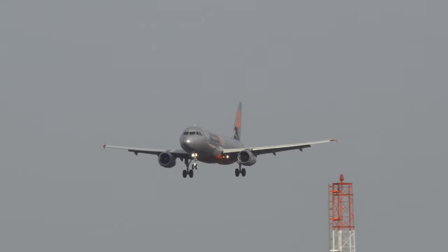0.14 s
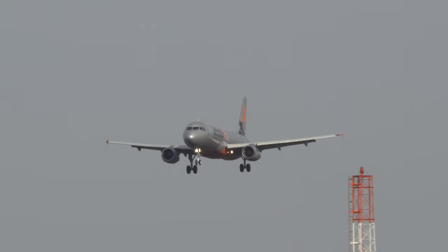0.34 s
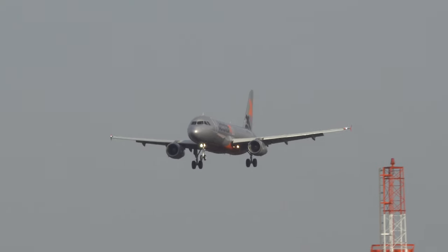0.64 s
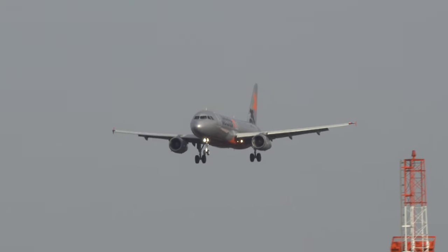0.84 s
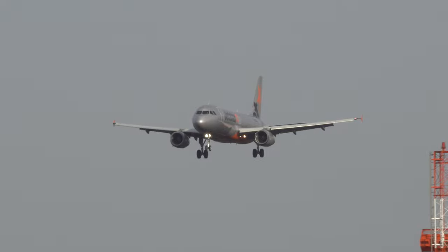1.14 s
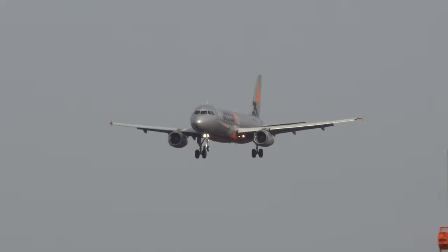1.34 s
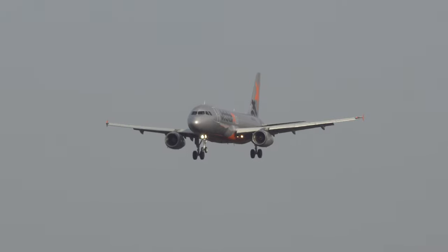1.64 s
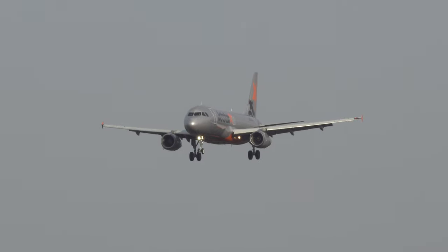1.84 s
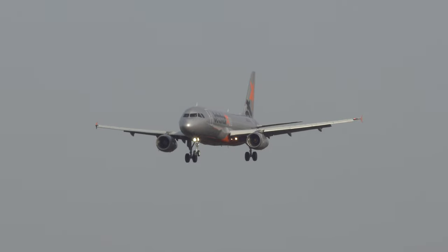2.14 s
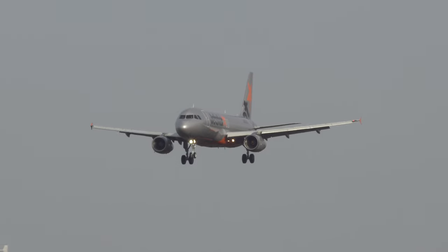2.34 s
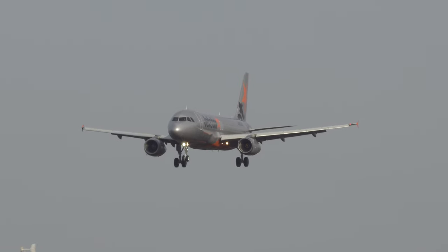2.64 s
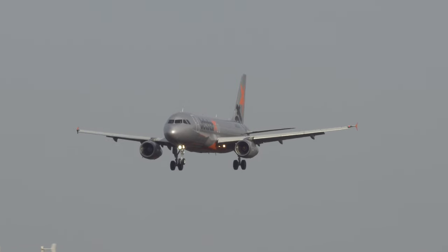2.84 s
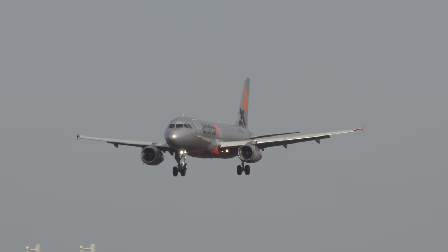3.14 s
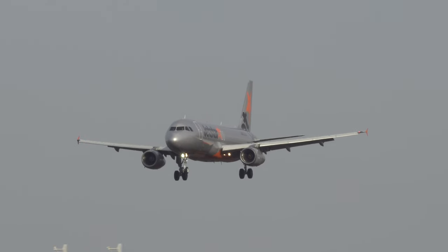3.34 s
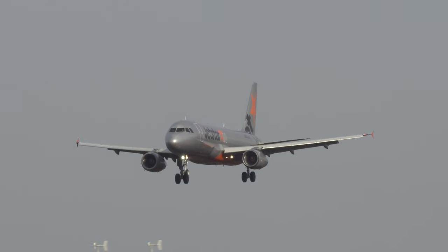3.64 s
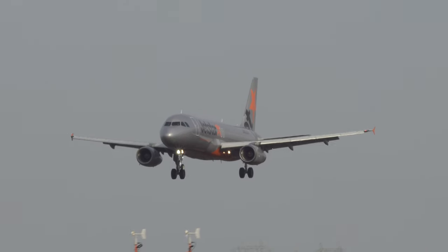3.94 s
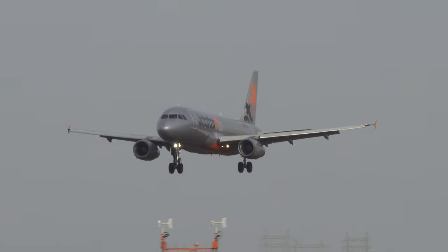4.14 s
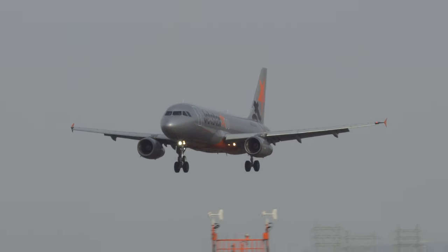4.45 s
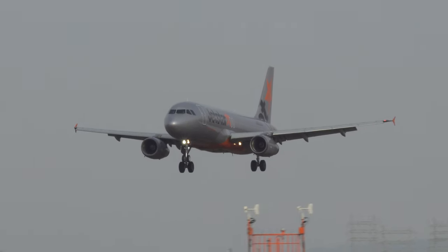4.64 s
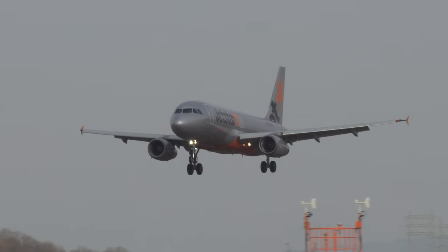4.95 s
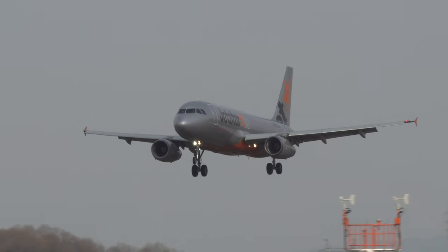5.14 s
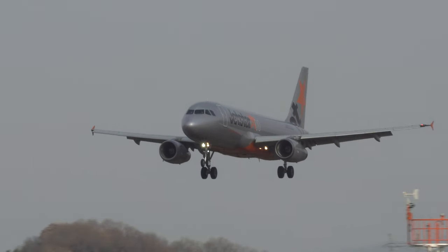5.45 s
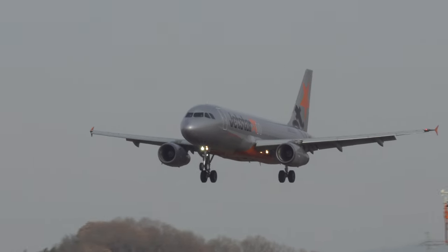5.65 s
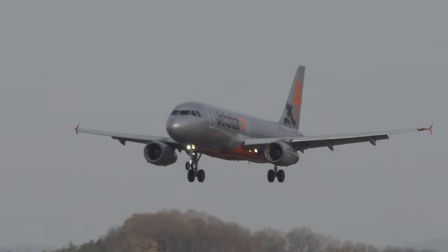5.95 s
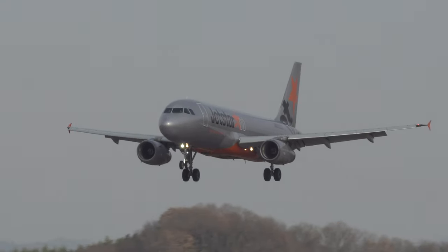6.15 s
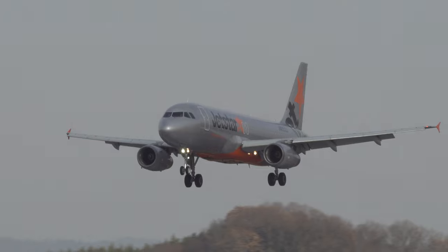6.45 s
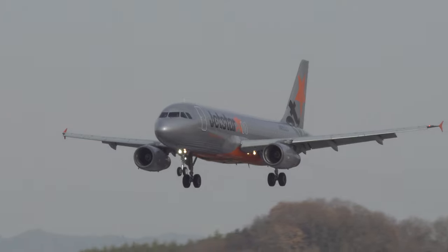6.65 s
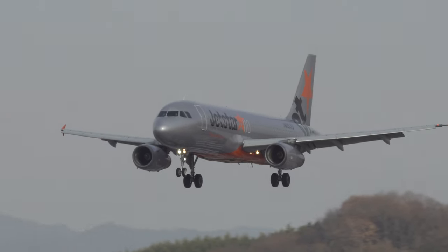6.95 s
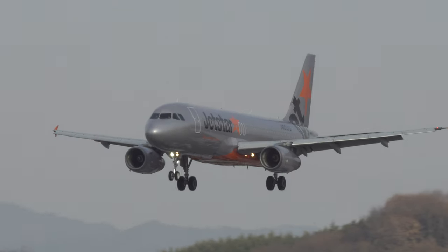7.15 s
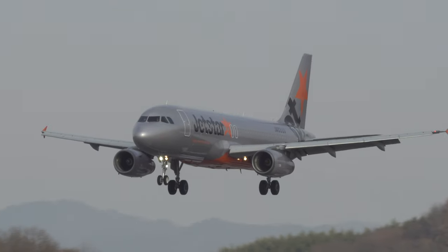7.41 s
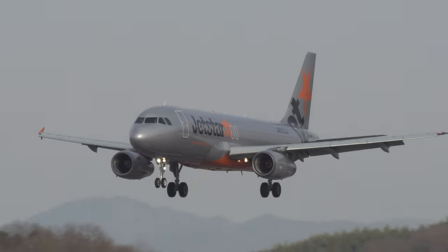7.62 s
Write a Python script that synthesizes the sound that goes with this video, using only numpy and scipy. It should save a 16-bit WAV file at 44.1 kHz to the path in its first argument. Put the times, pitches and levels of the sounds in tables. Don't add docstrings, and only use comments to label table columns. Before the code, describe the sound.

An open, windy field near an airport, heard by two spaced outdoor microphones. From the start, low wind pressure rumbles and thumps independently on each side, heavier on the right, with strong gusts around 3 and 3.5 s and again near 6.6 s that almost overload. Beneath lie soft field ambience, faint machine hums and steady hiss. Distant hoarse crow caws come at about 0.4, 1.0, 1.1, 1.6, 2.3 and 2.9 s. The jet is at first a muffled, far roar with a thin whine near 1.1 kHz; it rises a little by 2.5 s, then clearly from 4 to 5 s. Close-set fan tones and higher compressor tones shimmer, beat and fade in turn, sagging slightly in pitch. From 6 s the roar is brighter and flutters in turbulence, the whine sharper, one tone creeping up at the end. It stops around 7.8 s at its loudest, stronger on the right, before any flyover.

```python
import sys
import numpy as np
from scipy import signal
from scipy.fft import rfft, irfft, next_fast_len
from scipy.io import wavfile
from scipy.ndimage import uniform_filter1d

SR = 44100
rng = np.random.default_rng(int(sys.argv[2]) if len(sys.argv) > 2 else 0)


def wav_out(sig):
    wavfile.write(sys.argv[1], SR, np.round(np.clip(np.atleast_2d(sig).T, -1, 1) * 32767).astype(np.int16))


def invert_db(level):
    return 10 ** (np.asarray(level, dtype=float) / 20)


N = 343098
PADDED = next_fast_len(N)
HZ = np.fft.rfftfreq(PADDED, 1 / SR) + 1e-3
TIME = np.arange(N) / SR


def rms_one(x):
    return x / np.sqrt(np.mean(x ** 2) + 1e-20)


def in_time(rows):
    s, *columns = np.transpose(rows)
    return [np.interp(TIME, s, c) for c in columns]


def at_hz(points, hz, column=1):
    points = np.array(points)
    return np.interp(np.log(hz), np.log(points[:, 0]), points[:, column])


def drift(rate_hz):
    r = np.exp(-128 * np.pi * rate_hz / SR)
    slow = signal.lfilter([1], [1, -2 * r, r * r], rng.standard_normal(N // 64 + 2002))
    slow = slow[2000:]
    return np.interp(np.arange(N) / 64, np.arange(len(slow)), rms_one(slow))


def bumps(s, half_s, db):
    coarse = TIME[::64, None]
    bells = np.exp(-.5 * ((coarse - s) / half_s) ** 2)
    return np.interp(TIME, coarse[:, 0], bells @ db)


def coloured(spectrum, under=9.0, over=5.4):
    low_end = np.minimum(1, HZ / spectrum[0][0]) ** under
    high_end = np.minimum(1, spectrum[-1][0] / HZ) ** over
    return rfft(rng.standard_normal(PADDED)) * invert_db(at_hz(spectrum, HZ)) * low_end * high_end


def wave_of(spectrum):
    return irfft(spectrum, PADDED)[:N]


def band_rms(spectrum, low, high):
    inside = (HZ > low) & (HZ < high)
    return np.sqrt(2 * np.sum(np.abs(spectrum[inside]) ** 2)) / PADDED


# time in seconds, level in dB.
HISS = [(0.1, -67), (1.33, -65), (3.97, -68), (5.45, -65.5), (7.7, -69)]
# frequency in Hz, density in dB per Hz.
HISS_COLOUR = [(500, 2), (4500, 2.2), (11000, 1.3), (16000, 1.5)]
# pitch in Hz, level in dB.
WHISTLES = [(11958, -92), (11988, -92)]


def preamp():
    noises = [coloured(HISS_COLOUR, under=0.12) for side in range(2)]
    hiss = np.array([wave_of(n) / band_rms(n, 5000, 15000) for n in noises])
    whistles = sum(np.sqrt(2) * invert_db(db) * np.sin(2 * np.pi * hz * TIME) for hz, db in WHISTLES)
    side_db = np.array([[-.4], [.4]])
    return invert_db(in_time(HISS)[0] + 1.0 + side_db) * hiss + whistles


# frequency in Hz, density in dB per Hz.
AMBIENCE = [(200, -8), (350, -6), (450, 0), (600, -1), (900, -8), (1150, -5.5), (1500, -12), (2000, -17),
            (2600, -25), (3300, -34)]
# pitch in Hz, width in Hz, level in dB over the ambience.
HUMS = [(292, 14, 9), (712, 10, 5), (790, 14, 9), (1700, 25, 6)]
AMBIENCE_DB = -52.5


def field():
    hums_db = sum(db * np.exp(-2 * ((HZ - hz) / width) ** 2) for hz, width, db in HUMS)
    sides = []
    for side in range(2):
        ambience = rms_one(wave_of(coloured(AMBIENCE) * invert_db(hums_db)))
        sides.append(ambience * invert_db(2.1 * drift(1.5)))
    return invert_db(AMBIENCE_DB) * np.array(sides)


# start in seconds, length in seconds,
# first, middle and last pitch in Hz, level in dB.
CAWS = [
    (.42, .14, 1170, 1160, 1030, -56),
    (1.0, .13, 1020, 1070, 980, -53),
    (1.11, .09, 1290, 1220, 1130, -55),
    (1.58, .14, 960, 1040, 1000, -54),
    (2.33, .1, 990, 1010, 970, -57),
    (2.89, .1, 1230, 1170, 1110, -55),
]


def crows():
    out = np.zeros(N)
    for (s, length_s, *hz, db), start in zip(CAWS, rng.random(len(CAWS))):
        u = np.linspace(0, 1, round(length_s * SR))
        pitch = np.polyval(np.polyfit([0, .5, 1], hz, 2), u)
        phase = 2 * np.pi * (np.cumsum(pitch) / SR + start)
        voice = np.sin(phase) + .2 * np.sin(1.5 * phase)
        i = round(s * SR)
        out[i:i + len(u)] += invert_db(db + 3) * np.sin(np.pi * u) ** .7 * voice
    side_db = np.array([[0], [-2.0]])
    return out * invert_db(1.7 * drift(40.0) + side_db)


def gusts(spectrum, pressure_db, flutter_db):
    noise = coloured(spectrum, under=2.5, over=4.0) / np.sqrt(1 + (HZ / 105) ** 4)
    slow_share = 1 / (1 + (HZ / 45) ** 6)
    slow = wave_of(noise * np.sqrt(slow_share))
    size = np.abs(signal.hilbert(slow, PADDED)[:N]) ** 2
    size = uniform_filter1d(uniform_filter1d(size, size=2500), size=2500)
    slow = rms_one(slow / np.sqrt(size + .03 * size.mean()))
    fast = wave_of(noise * np.sqrt(1 - slow_share)) / band_rms(noise, 45, 130)
    fade_in = np.sin(np.pi / 2 * np.minimum(TIME / .04, 1)) ** 2
    return (invert_db(pressure_db - .7) * slow + invert_db(flutter_db) * fast) * fade_in


# time in seconds, left level in dB, right level in dB.
WIND = [(0, -24.5, -20), (.5, -22, -13.5), (1.3, -18.5, -12), (2.0, -19, -11.5), (2.4, -17, -14.5),
        (2.9, -16, -7.5), (3.2, -13, -10.5), (3.5, -13, -7.5), (3.9, -17, -15.5), (4.3, -17.5, -14.5),
        (4.8, -16.5, -12), (5.4, -21, -15.5), (5.7, -18, -20.5), (6.1, -23, -12), (6.6, -19, -8),
        (6.9, -14, -13.5), (7.3, -22.5, -13.5), (7.78, -29, -24)]
# time in seconds, left change in dB, right change in dB.
PUFFS = [(.62, 3, 0), (.8, -4, 0), (.92, 3, -2), (1.1, -6, 1), (1.2, 0, 2), (1.55, 5, -1), (1.78, -4, -2),
         (2.1, -2, 3), (2.2, 0, -3), (2.3, 6, 0), (2.42, -3, 0), (2.6, -1, 3), (2.7, 4, -5), (2.96, -2, 3),
         (3.3, 4, 0), (3.6, -4, -3), (3.7, 0, 3), (4.03, -3, 0), (4.2, 2, 2), (4.6, 3, 3), (4.9, -5, -3),
         (5.15, 3, 1), (5.6, -7, -3), (5.82, 6, 0), (5.95, 0, 4), (6.1, 2, -3), (6.5, 4, 0), (6.665, 0, -5),
         (7.05, -7, 0), (7.5, 6, 2)]
# frequency in Hz, density in dB per Hz.
WIND_LEFT = [(5, -22), (8, 6.5), (12, -5.5), (18, -0.5), (25, -10), (35, -18), (50, -24.5), (70, -25),
             (100, -21), (140, -44), (200, -50)]
WIND_RIGHT = [(5, -14.5), (8, 4), (12, 2), (18, -1), (25, -3), (35, -9), (50, -14), (70, -21), (100, -26.5),
              (140, -29), (200, -33.5)]
# left level in dB, right level in dB.
FLUTTER_DB = [-38.5, -26]
PUFF_S = 0.047
FLUTTER_FOLLOWS, FLUTTER_PUFFS = 0.91, 0.47


def wind():
    s, *puffs_db = np.transpose(PUFFS)
    out = []
    for colour, gust_db, db, base_db in zip((WIND_LEFT, WIND_RIGHT), in_time(WIND), puffs_db, FLUTTER_DB):
        puff_db = bumps(s, PUFF_S, db)
        swing_db = gust_db - gust_db.mean()
        flutter_db = base_db + FLUTTER_FOLLOWS * swing_db + FLUTTER_PUFFS * puff_db
        out.append(gusts(colour, gust_db + puff_db, flutter_db))
    return np.array(out)


def late(x, ms):
    return np.interp(TIME - ms / 1000, TIME, x)


# frequency in Hz, level in dB, extra lag in ms.
SHADE = [(200, -11.2, .09), (500, -11.2, .04), (1000, -11.9, .005), (2500, -11.8, -.01)]


def both_capsules(x, hz, lag_ms):
    left = invert_db(at_hz(SHADE, hz)) * late(x, lag_ms + at_hz(SHADE, hz, column=2))
    return np.array([left, x])


# time in seconds, half length in seconds,
# centre in Hz, change in dB.
EDDIES = [(0.0, 0.03, 280, 6), (0.037, .08, 1400, 2.5), (1.242, 0.3, 680, 4), (1.45, 0.13, 2360, 4),
          (1.9, 0.45, 610, 5.5), (1.9, 0.07, 790, 2.5), (2.6, 0.24, 280, 4), (3.053, 0.064, 1700, -1),
          (3.401, 0.33, 280, 2.5), (3.952, 0.056, 900, -4), (4.15, 0.09, 280, -1.5),
          (4.41, 0.035, 1500, 2.5), (4.702, 0.14, 710, -4), (4.983, 0.086, 795, 1), (5.4, 0.5, 430, 3.5),
          (5.434, 0.028, 1800, -2.5), (5.6, .1, 730, 3.5), (6.191, 0.069, 280, -1), (6.264, 0.12, 700, 2.5),
          (6.709, 0.092, 1200, 6), (7.113, 0.086, 1100, 5.5), (7.132, 0.044, 5200, 8),
          (7.352, 0.058, 705, 2.5), (7.5, 0.054, 5300, 2), (7.7, .15, 5530, 2), (5.747, 0.32, 197, 4.5),
          (.6, 0.18, 434, 1.5), (6.65, .1, 5230, -2), (7.55, 0.076, 1600, 2)]
# time in seconds, half length in seconds, change in dB.
EDGE_EDDIES = [(1.7, .15, 8), (2.25, .07, 6.5), (2.55, .1, 5), (3.0, .5, 3.5), (3.6, .3, 4),
               (4.197, 0.046, 9), (4.364, .07, 10), (4.747, 0.092, 9), (4.87, .03, -7), (4.983, .06, 5.5),
               (5.183, 0.043, 6.5), (5.5, 0.41, 6.5), (5.86, 0.04, -10), (5.97, 0.062, 1.5),
               (6.08, 0.044, -1), (6.238, 0.051, 9.5), (6.447, .1, -4.5), (6.66, 0.065, 5.5),
               (6.897, .08, -0.5), (7.3, .2, 2), (7.72, 0.2, -4.5)]
EDDY_OCTAVES, EDGE_HZ, EDGE_OCTAVES = 0.68, 3140, 0.21


def eddies(hz):
    s, half_s, centre_hz, db = np.transpose(EDDIES)
    reach = np.exp(-.5 * (np.log2(hz / centre_hz) / EDDY_OCTAVES) ** 2)
    edge = np.exp(-.5 * (np.log2(hz / EDGE_HZ) / EDGE_OCTAVES) ** 2)
    return bumps(s, half_s, db * reach) + edge * bumps(*np.transpose(EDGE_EDDIES))


# lower edge in Hz, upper edge in Hz.
JET_BANDS = [(190, 400), (450, 950), (1150, 1950), (2600, 3600)]
# frequency in Hz, density in dB per Hz.
ROAR = [(85, 4), (120, 5), (190, -5), (330, -4.5), (500, -5.5), (700, -3), (950, -2.5), (1150, -1),
        (1400, -2.5), (1750, -5.5), (2200, -10.5), (2700, -20), (3300, -29), (4800, -51)]
DISTANT_DB = [-44.5, -45.5, -47, -72]
FOLLOWS = [.25, .8, 1.01, 1.35]


def roar(near_db, lag_ms, patchy_db, absorb_db_per_s, scatter_db):
    noise, scattered = coloured(ROAR, under=2.2, over=9.0), coloured(ROAR)
    gains_db = []
    for distant_db, share, band in zip(DISTANT_DB, FOLLOWS, JET_BANDS):
        gains_db.append(distant_db + share * near_db - 20 * np.log10(band_rms(noise, *band)))
    gains_db.append(gains_db[3] - absorb_db_per_s * (TIME[-1] - TIME))
    places = np.log([np.sqrt(a * b) for a, b in JET_BANDS] + [4500])
    third_octave = np.log(2) / 3
    out = np.zeros((2, N))
    for hz in 70 * 2 ** (np.arange(20) / 3):
        place = np.interp(np.log(hz), places, np.arange(5))
        k = min(int(place), 3)
        level_db = (k + 1 - place) * gains_db[k] + (place - k) * gains_db[k + 1]
        flicker_db = patchy_db * (1 + min(hz / 2500, 1.2) ** 2) * drift(6.0)
        gain = invert_db(level_db + eddies(hz) + flicker_db)
        window = np.clip(1 - np.abs(np.log(HZ / hz)) / third_octave, 0, 1)
        out += both_capsules(gain * wave_of(noise * window), hz, lag_ms)
        out[0] += invert_db(scatter_db) * gain * wave_of(scattered * window)
    return out


def tone(hz, db, lag_ms, wander_hz, flutter_db):
    phase = 2 * np.pi * (np.cumsum(hz + wander_hz * drift(5.04)) / SR + rng.random())
    phase += .33 * drift(25.0)
    wave = np.sqrt(2) * invert_db(db + flutter_db * drift(12.0)) * np.sin(phase)
    return both_capsules(wave, hz.mean(), lag_ms)


# time in seconds, pitch in Hz.
FAN_A = [(0, 1128), (1.1, 1106), (1.9, 1095), (3.5, 1092), (5.1, 1082), (5.9, 1073), (6.5, 1063),
         (7.78, 1060)]
FAN_B = [(0, 1151), (1.2, 1136), (3.6, 1122), (5.2, 1102), (5.6, 1102), (6.6, 1082), (7.0, 1082),
         (7.5, 1092), (7.78, 1103)]
# time in seconds, pitch in Hz.
STAGE = [(0, 2083), (4.3, 2080), (5.2, 2086), (6.3, 2070), (6.8, 2060), (7.78, 2062)]
CORE = [(0, 2501), (.4, 2483), (1.6, 2379), (2.0, 2360), (4.0, 2319), (5.0, 2289), (6.5, 2265), (7.0, 2250),
        (7.6, 2290)]
# distant level in dB, then share of the nearness gained.
TONE_DB = [-54.5, -58, -84.5, -75.5, -69]
TONE_FOLLOWS = [0.99, 1.23, 1.84, 1.52, 1.1]
# time in seconds, half length in seconds, change in dB.
GLINTS_A = [(.2, .2, -12), (.66, 0.054, 3.5), (1.0, 0.053, 7), (1.2, .08, -11), (1.55, 0.18, 8.5),
            (2.45, 0.09, 4), (2.8, 0.082, -3), (3.06, 0.055, 7), (3.6, 0.49, -6.5), (4.3, 0.11, -6),
            (4.7, 0.18, -14), (4.97, 0.075, 12.5), (5.25, 0.14, 1.5), (5.5, 0.054, -3), (5.7, 0.074, 8),
            (6.05, 0.078, -2.5), (6.7, 0.11, 10.5), (7.13, 0.067, 3.5), (7.45, .08, 5.5)]
GLINTS_B = [(0, .1, 3), (.28, .1, 3.5), (.9, .3, -12), (2.1, 0.37, -11), (3.03, 0.081, 9), (3.4, .1, -8),
            (4.1, 0.48, 2), (4.75, 0.092, -0.5), (5.2, .15, -3), (5.6, 0.16, 6), (6.2, 0.27, 6.5),
            (6.42, .06, -6), (6.6, 0.088, 0.5), (6.9, 0.065, -3), (7.1, 0.048, 8.5), (7.72, .12, -8)]
GLINTS_TWICE = [
    (5.85, .1, -12.5),
    (6.2, .15, 12.5),
    (6.7, .08, 16.5),
    (7.1, .08, 8.5),
    (7.45, .15, -9.5),
    (7.78, .1, 8.5),
]
GLINTS_STAGE = [
    (0.801, .15, -10.5),
    (2.0, .15, 9),
    (4.0, 0.34, 3),
    (4.45, .12, 4),
    (5.2, .12, 12.5),
    (5.7, .2, -11),
    (6.3, .12, 5),
    (6.85, .15, 10),
    (7.65, .15, 6.5),
]
GLINTS_CORE = [
    (0, .2, -8),
    (2.4, .12, -2),
    (3.0, 0.37, -3),
    (3.9, 0.32, -2),
    (5.7, .55, -20),
    (6.6, .08, -4),
    (7.25, 0.13, 8.5),
    (7.78, .1, -7),
]


def whine(near_db, lag_ms):
    (fan_a,), (fan_b,), (stage,), (core,) = map(in_time, (FAN_A, FAN_B, STAGE, CORE))
    pitches = fan_a, fan_b, 2 * fan_b, stage, core
    glints = GLINTS_A, GLINTS_B, GLINTS_TWICE, GLINTS_STAGE, GLINTS_CORE
    out = np.zeros((2, N))
    for hz, distant_db, share, rows in zip(pitches, TONE_DB, TONE_FOLLOWS, glints):
        db = distant_db + share * near_db + bumps(*np.transpose(rows))
        out += tone(hz, db, lag_ms, wander_hz=hz.mean() / 650, flutter_db=2.8)
    return out


# time in seconds, lag in ms.
LAG = [(0, .93), (4, .91), (7.78, .87)]
# time in seconds, gain in dB over its distant level.
NEARNESS = [(0, -1), (1.5, -1), (2.5, 3.5), (3.9, 4), (4.4, 7.5), (5.0, 12), (5.7, 12.5), (6.3, 14.5),
            (6.6, 17.5), (7.0, 16.5), (7.78, 20)]


def scene():
    (lag_ms,), (near_db,) = in_time(LAG), in_time(NEARNESS)
    background = preamp() + field() + crows() + wind()
    jet = roar(near_db, lag_ms, patchy_db=0.8, absorb_db_per_s=3.0, scatter_db=-25.5)
    return background + jet + whine(near_db, lag_ms)


def band_limit(x):
    return signal.sosfilt(signal.butter(12, 15770, fs=SR, output="sos"), x)


def record(dry):
    rounded = dry / (1 + np.abs(dry) ** 18) ** (1 / 18)
    return band_limit(np.clip(rounded, -1, 1))


dry = scene()
out = record(dry)
wav_out(out)
```